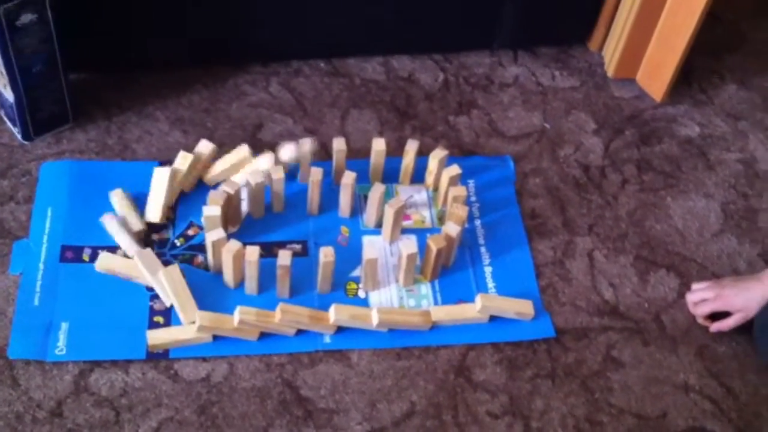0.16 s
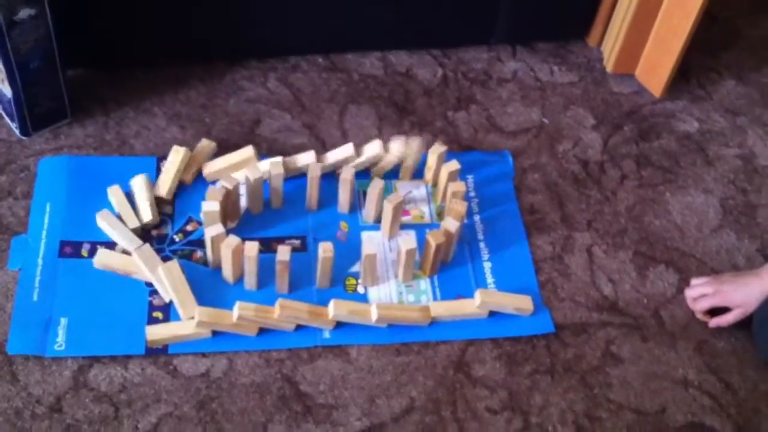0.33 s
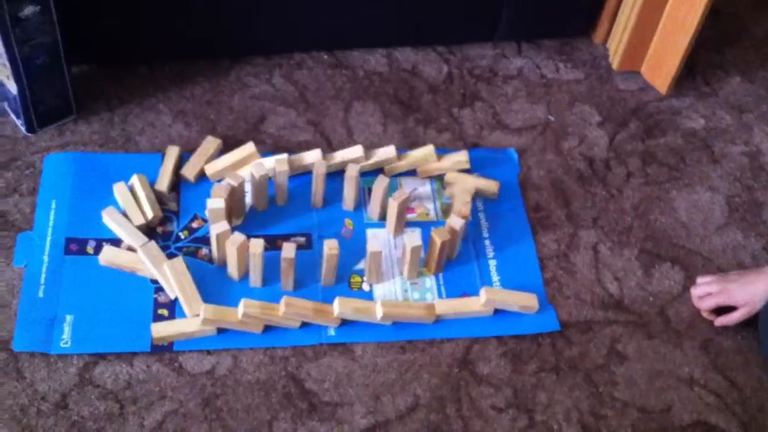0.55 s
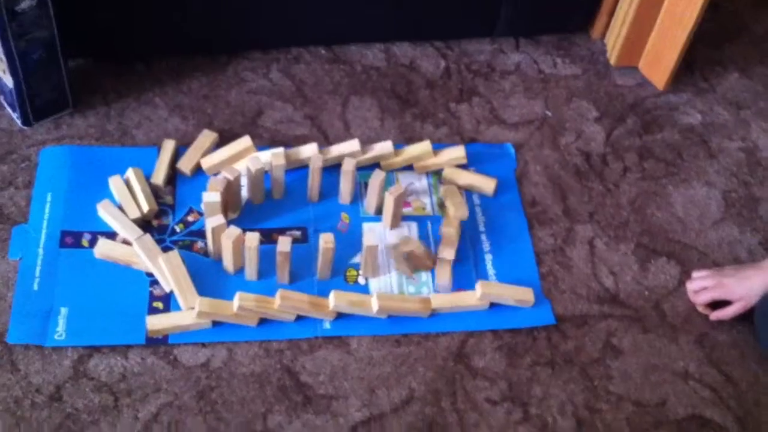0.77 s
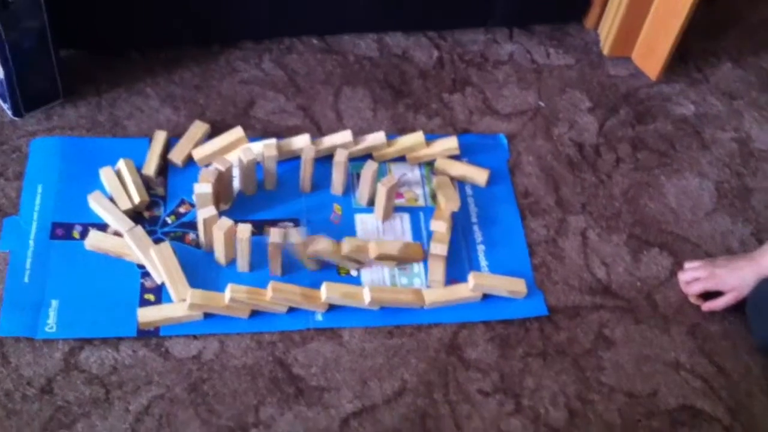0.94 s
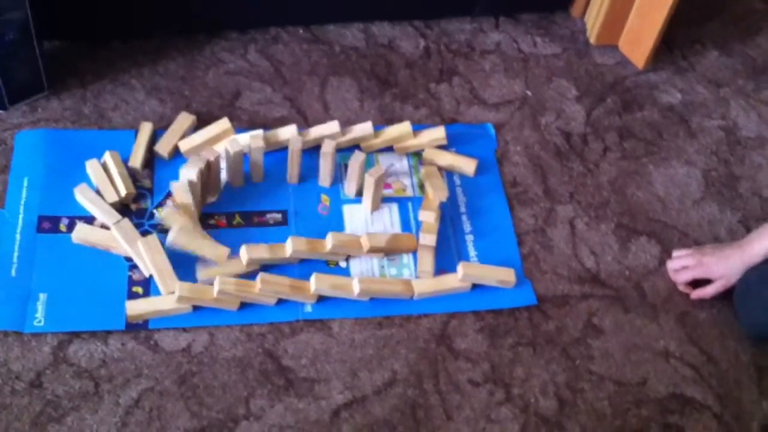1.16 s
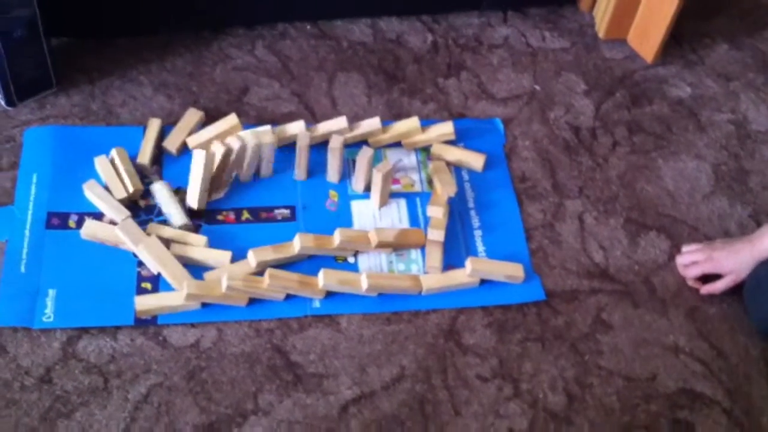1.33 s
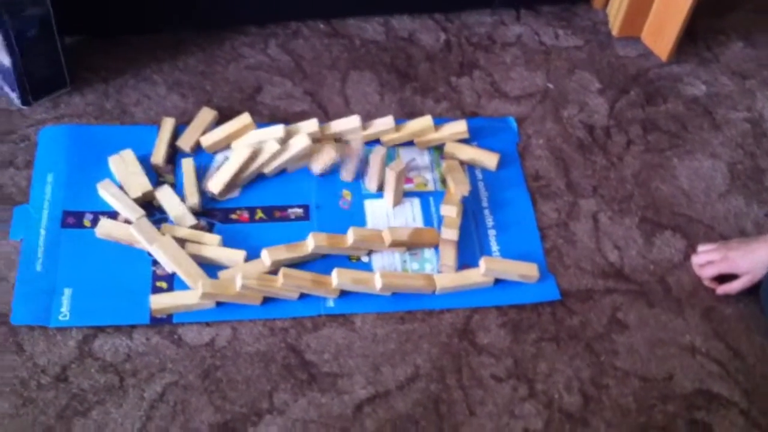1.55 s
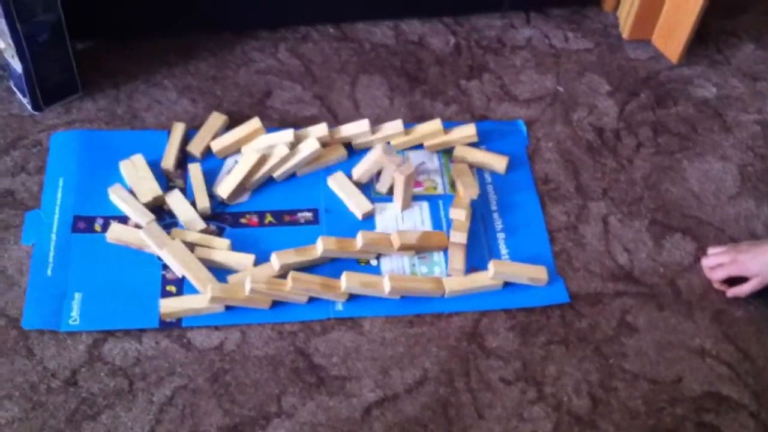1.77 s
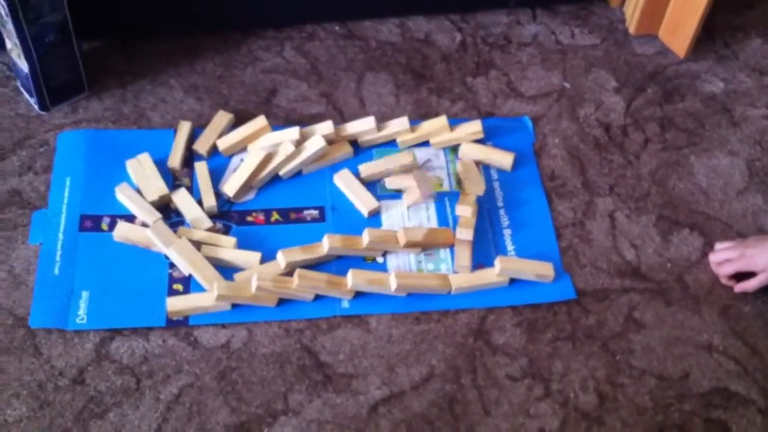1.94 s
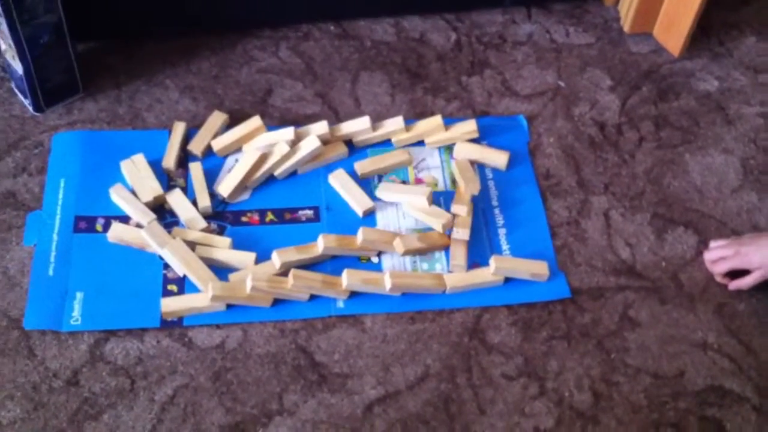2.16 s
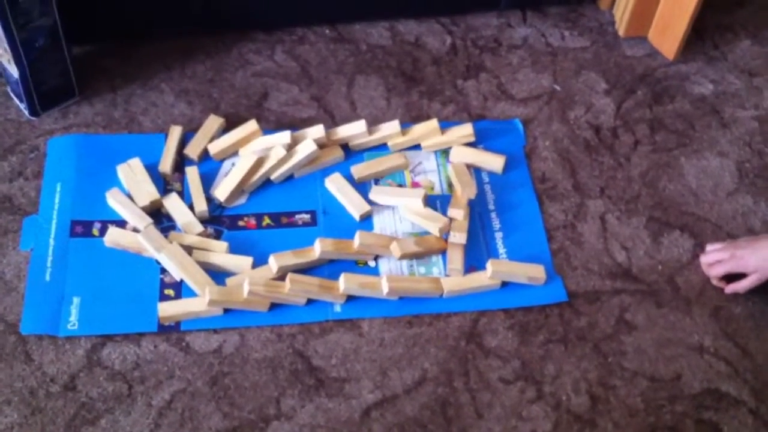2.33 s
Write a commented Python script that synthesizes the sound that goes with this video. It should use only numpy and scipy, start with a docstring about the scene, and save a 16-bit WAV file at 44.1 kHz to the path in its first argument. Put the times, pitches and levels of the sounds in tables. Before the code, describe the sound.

Wooden blocks topple like dominoes in a small room, starting with a quick run of light clicks and rattling for about 0.7 seconds. A sharp, bright clack comes near 0.9 seconds, followed by a few lighter ones. From 1.3 seconds the knocks come thick again, with dull thumps on card over carpet. Two last heavier falls land around 1.8 and 2.1 seconds, then the blocks settle.

```python
"""A small room, where wooden blocks topple like dominoes on a sheet of card laid over a carpet.
Each impact excites damped modes: a falling block lands on its neighbour with a snap, a short woody
ring and a thud of the card, while standing blocks, free to vibrate, clack brightly together.
Heavy falls thump the floor and light rattling fills the gaps. The room answers with echoes,
standing waves and a short reverberation, over a quiet hiss."""
import sys
import numpy as np
from scipy import signal
from scipy.fft import rfft, irfft, next_fast_len
from scipy.io import wavfile
from scipy.ndimage import uniform_filter1d

SR = 44100
rng = np.random.default_rng(int(sys.argv[2]) if len(sys.argv) > 2 else 0)


def dump_mix(stems):
    """Bounce the given channels to the path in sys.argv[1] as a 16-bit WAV at rate SR."""
    frames = np.atleast_2d(stems).T  # one column per channel
    limited = np.clip(frames, -1, 1)  # hard clip at full scale
    pcm = np.round(limited * 32767).astype(np.int16)
    wavfile.write(sys.argv[1], SR, pcm)


N = 105840
T = np.arange(2048) / SR  # seconds since an impact

# Blocks landing on their neighbours. Each row: start in seconds, relative levels of snap, wood ring
# and thud in dB, wood pitch ratio, hardness as a tilt in dB per octave, card pitch ratio.
LANDINGS = [(.0, -39.5, -53, -48.5, 0.99, -3, 0.89), (0.112, -47, -55, -46, 1.3, 0, 1.38),
            (.151, -43.5, -47, -56, 1.02, 9, 1.7), (.166, -42, -74, -45.5, 1.1, -3, 1.35),
            (.222, -30.5, -47, -45.5, 0.68, -4, 1.27), (.230, -48, -39.5, -46, 0.88, 3, 0.65),
            (0.2355, -24.5, -32, -33, 1.04, -5, 1.06), (.272, -29, -34.5, -47, 1.02, -2, 1.13),
            (.276, -28, -35.5, -31.5, 1.08, 5.5, 0.96), (0.2839, -25, -31, -38, 1.11, -3.5, 0.96),
            (.2929, -22.5, -33.5, -34.5, 0.99, -10.5, 1.14), (0.3381, -29.5, -39, -39.5, 0.96, 11, .95),
            (0.4003, -33.5, -38, -43.5, 1.16, 5.5, 1.07), (.440, -28.5, -37, -40, 1.06, 4, 1.06),
            (.4747, -25.5, -33.5, -39, 0.93, -6, 1.05), (.551, -30, -37, -46, 0.88, -1.5, 0.93),
            (.562, -48, -44, -46, 0.98, 6, .95), (0.577, -33, -41.5, -46, 1.08, -12, 0.81),
            (.588, -30.5, -38, -43, 1.08, 0, 1.5), (.636, -19, -30, -30.5, 1.09, 1, 1.67),
            (0.6382, -38, -36.5, -33, 0.95, -7, 0.83), (0.7059, -48, -57, -52, 0.92, -5, 1.12),
            (1.3253, -29.5, -41.5, -37, 1.48, -5, 0.92), (1.3322, -27, -33, -32, 1.02, -3, 0.99),
            (1.3633, -21.5, -23.5, -33, 1.03, 0.5, 1.14), (1.3772, -22, -30, -33, 1.03, 1, 1.03),
            (1.4313, -18, -29.5, -37, 1.06, -0.5, 0.9), (1.441, -44, -40, -55, 1.1, -16, 1),
            (1.4551, -32, -39, -40.5, .96, -4, 1.04), (1.523, -51, -44.5, -43, 1.1, 1, 1.07),
            (1.532, -31.5, -40, -30.5, 1, 2, 1), (1.5958, -29.5, -40, -42, 1.6, -2, 1.1),
            (1.5978, -20, -29, -44, 1, -1.5, 1.3), (1.6345, -20, -35, -38, 1.06, -2.5, 1.27),
            (1.643, -33, -36, -35, 1.06, 3.5, 1.13), (1.679, -35.5, -47, -51, 1.15, -8, 0.82),
            (1.792, -19, -30.5, -32, 1, -2, 0.984), (2.0624, -23.5, -47.5, -35, 0.91, 1, 1.14),
            (2.066, -24, -34, -39.5, 0.94, -7, 0.92), (2.106, -26.5, -34, -36.5, 1.01, -1.5, 1.13),
            (2.157, -48, -55, -47.5, 1.43, 4, 1.3), (2.275, -48, -52, -50, 1.07, 3.5, 1.2)]
# Standing blocks colliding. Each row: start in seconds, relative levels of wood, ping and thud in dB,
# wood pitch ratio, ping pitch ratio, contact cut-off in Hz.
CLACKS = [(.746, -45, -58, -69, 0.63, 0.75, 6240), (0.813, -39.5, -48, -54, 1.4, 0.78, 6060),
          (0.834, -34.5, -66, -43, 1.3, 1.14, 4980), (.871, -29, -58, -38, 0.77, 0.83, 4120),
          (.8765, -29, -54, -44, 1.3, 0.98, 4670), (0.8928, -8, -24.5, -27, 0.91, .985, 4400),
          (.993, -16, -27.5, -35, 1.24, 1.025, 6900), (1.0563, -25, -47, -38.5, 1.03, 1.14, 5200),
          (1.102, -30.5, -48, -52, 0.85, 1, 4550), (1.118, -45, -40.5, -47.5, 1, 1.06, 6900),
          (1.161, -41.5, -51, -64, 1.74, 1.02, 5960), (1.2282, -32, -52, -49, 1.14, .9, 5940),
          (1.2671, -31, -50.5, -46, 0.75, 1, 4400)]
# Heavy falls that reach the floor. Each row: start in seconds, level in dB.
FLOOR_BLOWS = [(0.236, -31), (0.997, -23.5), (1.119, -31), (1.268, -33), (1.3638, -35), (1.4308, -19),
               (1.533, -22), (1.598, -21), (1.794, -13.5), (2.065, -15.5)]
# Envelope of the rattling. Each row: time in seconds, relative level in dB.
RATTLE_LEVELS = [(0.0, -47), (0.23, -49.5), (0.41, -44.5), (0.49, -46.5), (0.68, -44), (0.77, -61),
                 (1.33, -43.5), (1.48, -54), (1.54, -38.5), (1.65, -49), (1.81, -64), (2.11, -48),
                 (2.28, -65.5), (2.4, -56)]

# Normal modes. Each row: frequency in Hz, relative level in dB, time to decay by 60 dB in seconds.
LEANING_MODES = [(740, -4.5, 0.009), (960, -4.5, 0.0089), (1290, -7.5, 0.025), (1460, 3, .016),
                 (1648, -2, 0.015), (1847, -1.5, 0.0088), (2313, 2, 0.012), (2516, 3, 0.007),
                 (3110, 0.5, 0.015), (3530, -3, 0.0025), (4260, -9.5, 0.0085)]  # a block pressed against others
FREE_MODES = [(1030, -13, 0.036), (1318, -5, 0.02), (1930, -10, 0.011), (2360, -2, 0.0074), (2694, 3, .014),
              (3460, 4.5, 0.0099), (3770, 1, 0.012), (5350, -6, 0.007)]  # a free block bending and twisting
PING_MODES = [(8070, -10.5, 0.015), (9560, -2, 0.023), (9360, 2.5, 0.016), (10600, -10, 0.0033)]  # its highest modes
CARD_MODES = [(218, -12, 0.012), (330.6, -3.5, 0.024), (386.3, 3.5, 0.022), (475, 0.5, .02),
              (611, -2, 0.029)]
FLOOR_MODES = [(70, -23, .031), (120, -5, 0.059), (171, 3, .032), (238, 5.5, 0.064), (295, 3, 0.016)]
ROOM_MODES = [(174, -5.5, 0.59), (218, -0.5, 0.24), (280.6, -2.5, 0.34), (310.6, -8, 0.79),
              (394.9, 2.5, 0.15), (482.4, 3.5, 0.14)]

# Early reflections from the walls. Each row: delay in seconds, level in dB.
WALL_ECHOES = [(0.0107, -18.5), (0.0126, -14.5), (0.0178, -20.5)]
# Reverberation time. Each row: frequency in Hz, time to decay by 60 dB in seconds.
ROOM_T60 = [(150, 0.31), (400, 0.18), (1000, 0.29), (2800, 0.21), (7000, 0.22), (9500, 0.25), (15000, 0.17)]

# Spectral envelopes. Each row: frequency in Hz, relative level in dB.
SNAP_SPECTRUM = [(200, -25.5), (800, 0), (2000, 0.5), (4000, -2), (6000, -5), (8000, -1), (11000, 1),
                 (14000, 2), (16000, -7)]
RUB_SPECTRUM = [(200, -10), (800, 3), (4000, -11.5), (6000, -12), (10000, 4), (14000, -2)]
TAIL_SPECTRUM = [(60, -14.5), (130, 1.5), (250, 2), (600, -1), (1200, 2), (3000, -2), (6000, -6),
                 (10000, -8.5), (15000, -3)]
HISS_SPECTRUM = [(15, -11), (25, -3.5), (55, -25), (110, -6), (309, -23.5), (540, 2.5), (700, -3),
                 (1230, -10), (1400, -10), (1650, -18), (2280, -11.5), (2760, -15), (8830, -23.5),
                 (16000, -22)]
MIC_RESPONSE = [(30, -49), (70, -7), (125, -11.5), (175, -4.5), (260, -3.5), (400, -5), (800, -4),
                (1500, -3), (3000, 0), (6000, 2.5), (10000, -4.5), (15500, -13.5)]

# Gains added to the relative levels in the tables.
SNAP_DB, WOOD_DB, THUD_DB = 11.5, 22.5, 23.5
CLACK_RING_DB, CRACK_DB, CLACK_SNAP_DB, PING_DB, CLACK_THUD_DB = 7, 7, -18, 22.5, 20.5
RATTLE_DB, TAIL_DB, ROOM_MODES_DB = 10.5, -1.5, -51.5


def landings():
    """Impact excitation: a falling block snaps onto its neighbour, rings briefly and thumps the card."""
    out = np.zeros(N)
    for start, snap_db, wood_db, thud_db, pitch, tilt_db, card_pitch in LANDINGS:
        wood = amp(wood_db + WOOD_DB) * ring(LEANING_MODES, pitch, tilt_db=tilt_db)
        click = amp(snap_db + SNAP_DB) * snap()
        card = amp(thud_db + THUD_DB) * thud(card_pitch)
        add(out, onset(start), click + wood + card)
    return out


def clacks():
    """Free vibration: standing blocks meet with a crack and ring, with a high ping and little thud."""
    out = np.zeros(N)
    for start, wood_db, ping_db, thud_db, pitch, ping_pitch, cutoff_hz in CLACKS:
        # Free blocks vary less in pitch than leaning ones.
        wood = amp(CLACK_RING_DB) * ring(FREE_MODES, pitch, scatter=0.015)
        wood += amp(CRACK_DB) * crack(cutoff_hz)
        wood += amp(CLACK_SNAP_DB) * snap()
        ping = amp(ping_db + PING_DB) * ring(PING_MODES, ping_pitch, scatter=0.0077)
        card = amp(thud_db + CLACK_THUD_DB) * thud(pitch=1.258)
        add(out, onset(start), amp(wood_db) * wood + ping + card)
    return out


def ring(modes, pitch=1, scatter=0.021, tilt_db=0, spread_db=2, blur=0.018):
    """Modal superposition: damped sines add, and a harder blow tilts them towards the treble."""
    hz, db, t60 = np.transpose(modes)[:, :, None]
    level, detune, polarity = rng.standard_normal((3, len(modes), 1))
    gain = np.sign(polarity) * amp(db + spread_db * level + tilt_db * np.log2(hz / hz[0]))
    # The shifting contact broadens each mode by a share of its frequency.
    walk = np.cumsum(rng.standard_normal((len(modes), len(T))), axis=1)
    drift = np.sqrt(2 * np.pi * blur * hz / SR) * walk
    phase = 2 * np.pi * hz * pitch * (1 + scatter * detune) * T + drift
    return unit(np.sum(gain * fade(t60) * np.sin(phase.astype(np.float32)), axis=0))


def contact(chatter_t60=0.017, chatter_db=2):
    """The contact force is an impulse followed by the decaying chatter of the two faces."""
    force = amp(chatter_db) * unit(rng.standard_normal(len(T)) * fade(chatter_t60))
    force[0] -= 1
    return whiten(force)


def snap():
    """A brief force has a broad spectrum: the click of an edge landing on wood."""
    return unit(colour(contact(), SNAP_SPECTRUM))


def crack(cutoff_hz, low_hz=1010):
    """Contact time limits the bandwidth of a collision: a shorter contact reaches higher."""
    band = signal.butter(4, [low_hz, min(cutoff_hz, SR / 3)], "band", fs=SR, output="sos")
    return unit(signal.sosfilt(band, contact()))


def thud(pitch=1, low_hz=165):
    """The card's damped modes give a dull knock, thin in the deep bass."""
    highpass = signal.butter(2, low_hz, "high", fs=SR)
    return unit(signal.lfilter(*highpass, ring(CARD_MODES, pitch)))


def rebounds(mean_gap_s=0.005, first_db=-12, loss_db=4):
    """Inelastic collision: three tiny, uneven rebounds follow each landing, losing energy in turn."""
    out = np.zeros(N)
    for start, snap_db, wood_db, _, pitch, tilt_db, _ in LANDINGS:
        delays = np.cumsum(mean_gap_s * (0.5 + rng.random(3)))
        for bounce, delay in enumerate(delays):
            scuff = amp(snap_db + SNAP_DB) * rub()
            wood = amp(wood_db + WOOD_DB) * ring(LEANING_MODES, pitch, tilt_db=tilt_db)
            add(out, start + delay, amp(first_db - loss_db * bounce) * (scuff + wood))
    return out


def floor_thumps():
    """Structure-borne sound: blocks that fall flat drive the floor's modes through the carpet."""
    out = np.zeros(N)
    for start, db in FLOOR_BLOWS:
        add(out, start, amp(db) * ring(FLOOR_MODES))
    return out


def rattle(count=320, spread_db=3.5):
    """Light random impacts overlap into a rattle as fallen blocks shift against each other."""
    out = np.zeros(N)
    ticks = [ring(LEANING_MODES) + amp(1) * (thud() + rub()) for _ in range(20)]
    starts = (np.arange(count) + rng.random(count)) / count * N / SR
    levels = np.interp(starts, *np.transpose(RATTLE_LEVELS)) + RATTLE_DB
    levels += spread_db * rng.standard_normal(count)
    for start, db, tick in zip(starts, levels, rng.choice(ticks, count)):
        add(out, start, amp(db) * tick)
    return out


def rub(t60=0.018):
    """Sliding friction: one face slipping on another makes a soft burst of noise."""
    envelope = fade(t60) * (1 - fade(t60))
    return unit(colour(rng.standard_normal(len(T)) * envelope, RUB_SPECTRUM))


def room(x, stretches=13, tail_onset_s=0.0066):
    """Reflection adds wall echoes, standing waves and a diffuse tail to the direct sound."""
    t = np.arange(SR // 3) / SR
    waves = sum(amp(db) * fade(t60, t) * np.cos(2 * np.pi * hz * t) for hz, db, t60 in ROOM_MODES)
    response = amp(ROOM_MODES_DB) * waves
    response[0] += 1  # direct sound
    for delay, db in WALL_ECHOES:
        response[round(delay * SR)] += amp(db)
    # The tail changes as the fall moves on: each stretch of time has its own decaying noise.
    hz, age, spectra = signal.stft(rng.standard_normal((stretches, len(t))), SR, nperseg=256)
    decay = fade(along(ROOM_T60, hz)[:, None], age)
    tails = signal.istft(spectra * decay, SR)[1][:, :len(t)]
    tails *= 1 - np.exp(-(t / tail_onset_s) ** 2)
    out = np.zeros(N)
    for stretch, tail in zip(np.array_split(np.arange(N), stretches), tails):
        diffuse = amp(TAIL_DB) * colour(whiten(tail), TAIL_SPECTRUM)
        add(out, stretch[0] / SR, signal.fftconvolve(x[stretch], response + diffuse))
    return out


def hiss(rms_db=-62):
    """Stationary coloured noise forms the quiet background."""
    return amp(rms_db) * np.sqrt(N) * unit(colour(rng.standard_normal(N), HISS_SPECTRUM))


def onset(start, lag_s=0.001029):
    """A short lag: each impact sounds about a millisecond after its listed start."""
    return start + lag_s


def amp(db):
    """Amplitude grows tenfold for every 20 dB."""
    return 10 ** (np.asarray(db) / 20)


def unit(x):
    """Normalisation to an energy of one."""
    return x / np.sqrt(np.sum(x ** 2) + 1e-20)


def along(points, hz):
    """Interpolation of (Hz, value) points on a logarithmic frequency axis."""
    point_hz, values = np.transpose(points)
    return np.interp(np.log(hz + 1), np.log(point_hz + 1), values)


def fade(t60, t=T):
    """Exponential decay by 60 dB in t60 seconds."""
    return np.exp(-np.log(1000) * t / np.maximum(t60, 1e-4))


def colour(x, points, size=2048):
    """Minimum-phase filtering: folding the cepstrum makes the (Hz, dB) response causal."""
    gain = amp(along(points, np.fft.rfftfreq(size, 1 / SR)))
    cepstrum = irfft(np.log(gain))
    cepstrum[1:size // 2] *= 2
    cepstrum[size // 2 + 1:] = 0
    response = irfft(np.exp(rfft(cepstrum)))
    return signal.oaconvolve(x, response)[:len(x)]


def whiten(x):
    """Spectral flattening leaves a noise burst with no pitch of its own."""
    size = 2 * len(x)
    spectrum = rfft(x, size)
    envelope = uniform_filter1d(np.abs(spectrum), size=5) + 1e-12
    return unit(irfft(spectrum / envelope, size)[:len(x)])


def add(track, start_s, sound):
    """Superposition: a sound adds to the track from its start time."""
    first = int(np.clip(round(start_s * SR), 0, N - 1))
    track[first:first + len(sound)] += sound[:N - first]


def scene():
    """A linear system: the summed impacts pass through room and microphone, over the hiss."""
    background = hiss()
    blocks = landings() + rebounds() + clacks() + floor_thumps() + rattle()
    return (colour(room(blocks), MIC_RESPONSE) + background)[None]


def record(dry):
    """Band limiting: an ideal low-pass filter removes the highest treble."""
    size, top_hz = next_fast_len(N + SR // 2), 16100
    passband = np.fft.rfftfreq(size, 1 / SR) < top_hz
    return irfft(rfft(dry, size) * passband, size)[:, :N]


dry = scene()
out = record(dry)
dump_mix(out)
```